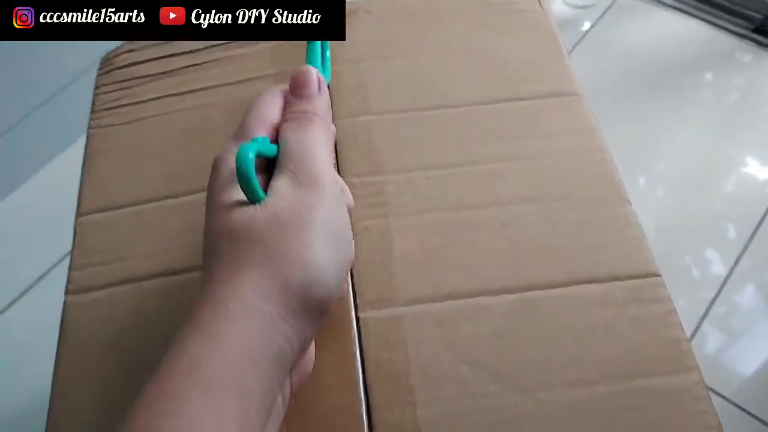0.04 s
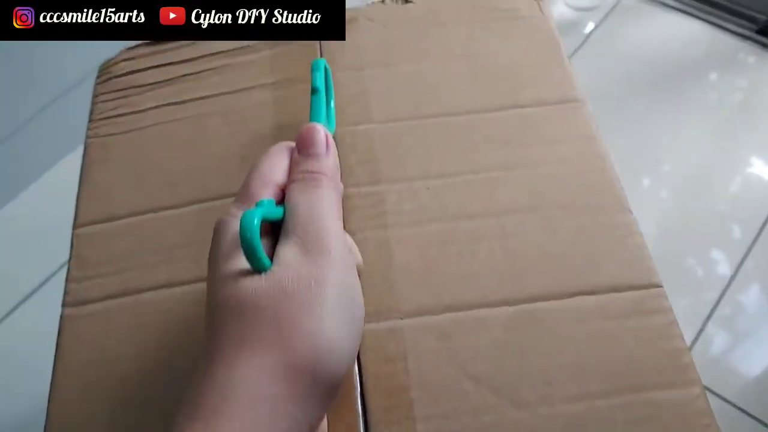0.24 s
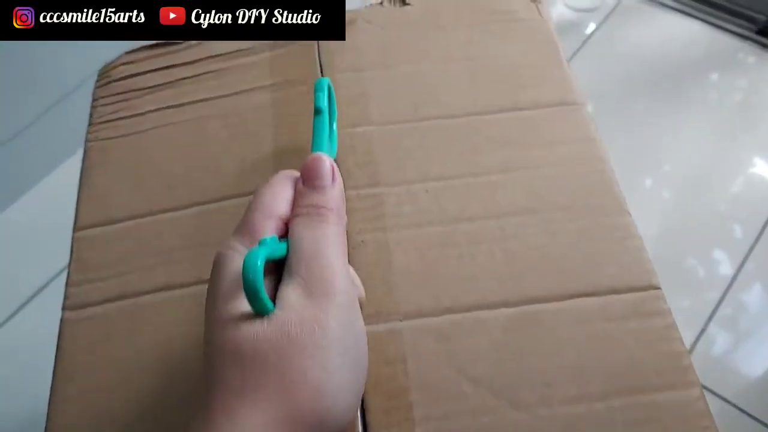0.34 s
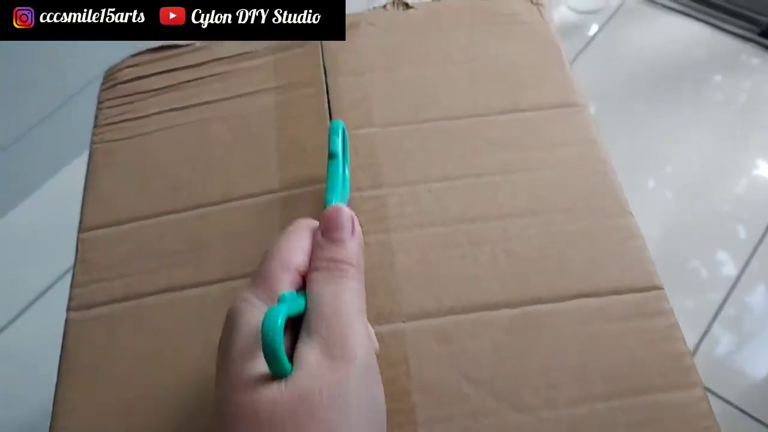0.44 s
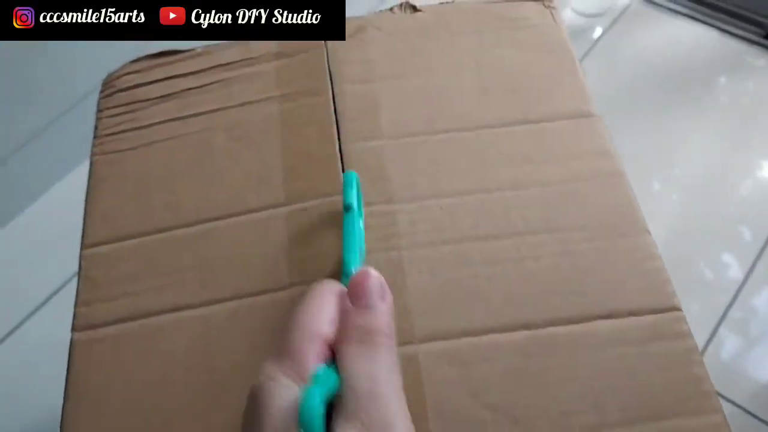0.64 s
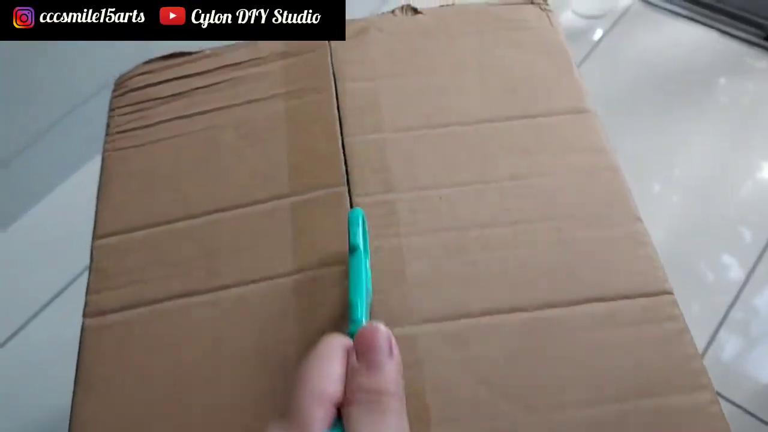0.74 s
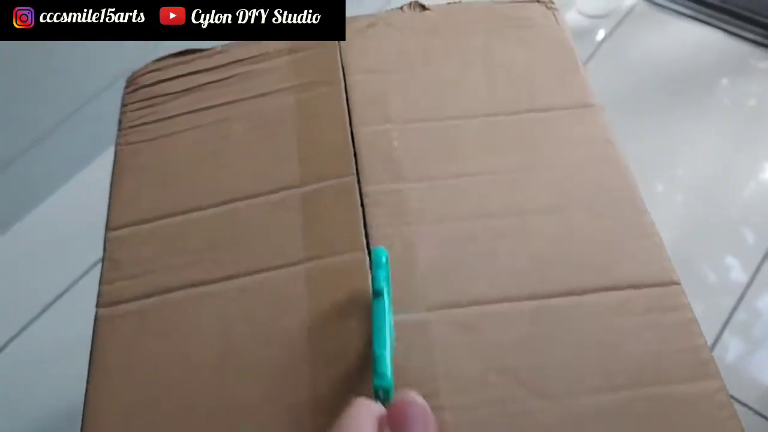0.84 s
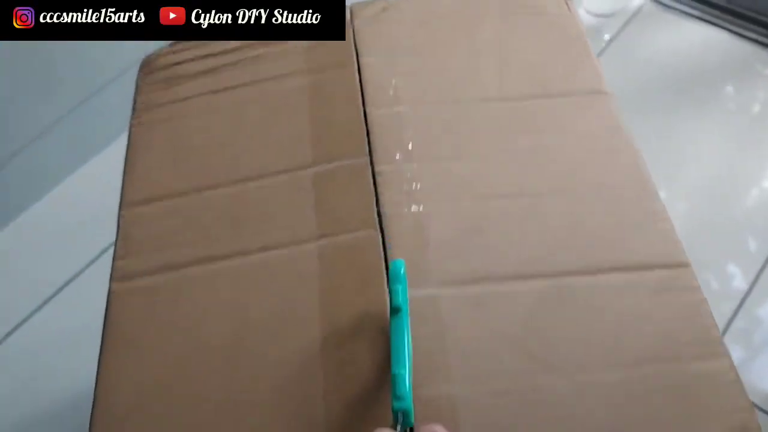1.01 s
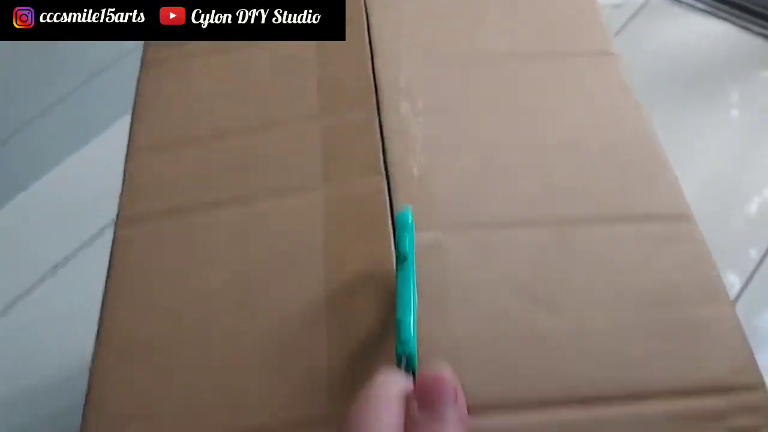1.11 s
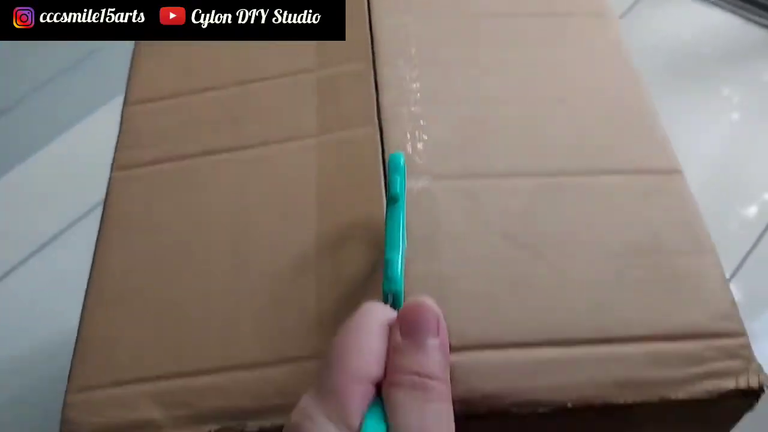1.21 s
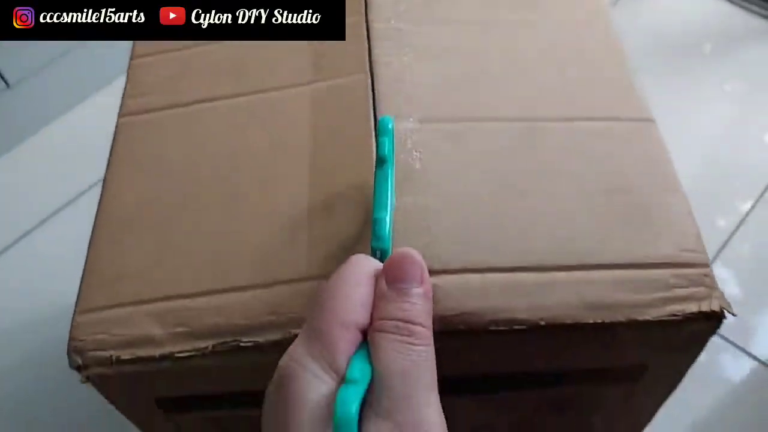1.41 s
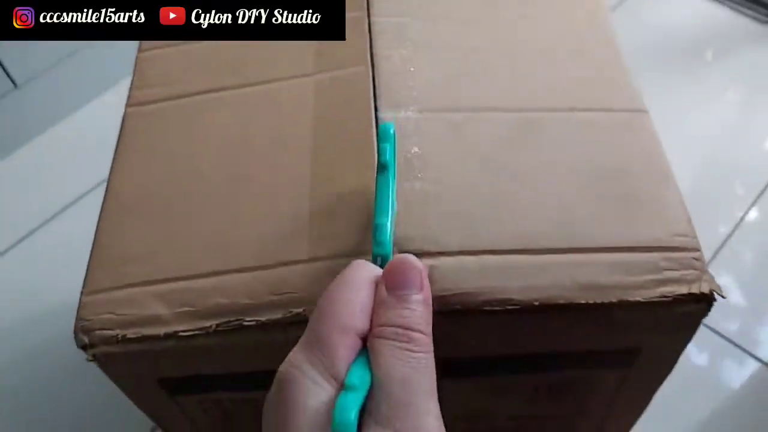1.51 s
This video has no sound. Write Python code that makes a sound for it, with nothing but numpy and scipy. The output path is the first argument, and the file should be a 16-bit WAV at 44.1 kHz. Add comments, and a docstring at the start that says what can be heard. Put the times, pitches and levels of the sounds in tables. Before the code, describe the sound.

Scissors scraping through packing tape on a cardboard box, snagging and snapping, then sliding on.

```python
"""A scissor blade is drawn along the taped seam of a cardboard box in a small hard-floored room.
First it snags and jerks free: each time the tape crackles, a flap thumps and the box rings.
After the loudest snap, at 0.72 s, it runs on in a steady rasp of breaking fibres; friction
keeps the box droning and the cut edge creaks. Near 1.2 s it rests, then goes on more lightly."""
import sys
import numpy as np
from scipy import signal
from scipy.fft import rfft, irfft
from scipy.io import wavfile
from scipy.ndimage import uniform_filter1d

SR = 44100
rng = np.random.default_rng(int(sys.argv[2]) if len(sys.argv) > 2 else 0)


def int16_out(signal):
    """Quantize to a 16-bit WAV file."""
    q = np.round(np.clip(np.atleast_2d(signal).T, -1, 1) * 32767)
    wavfile.write(sys.argv[1], SR, q.astype(np.int16))


N = 68355
T = np.arange(N) / SR

# modes of flaps and enclosed air: (frequency [Hz], thumped gain [dB], rubbed gain [dB], t60 [s])
BOX_MODES = [(121, -20, -14, 0.093), (162.8, -21.5, 2, 0.11), (184.2, -22.5, -4, 0.15),
             (306.7, -5.5, -7.5, 0.07), (373.4, -41, 0, 0.09), (474, -31, -20, 0.1),
             (617, -19, -13.5, 0.041), (738, -16.5, -19.5, 0.045)]


def from_db(db):
    """Decibels to gain."""
    return 10 ** (np.asarray(db) / 20)


def unit_rms(x):
    """Scale to rms 1."""
    return x / np.sqrt(np.mean(x ** 2) + 1e-20)


def at_hz(points, hz):
    """Interpolate a curve over log frequency."""
    points_hz, values = np.transpose(points)
    return np.interp(np.log(hz), np.log(points_hz), values)


def butter(x, hz, kind, order=2):
    """Butterworth filter."""
    return signal.sosfilt(signal.butter(order, hz, kind, fs=SR, output="sos"), x + 1e-18)


def band(x, hz, ratio):
    """Band-pass from hz / ratio to hz * ratio."""
    return butter(x, [hz / ratio, hz * ratio], "band")


def flutter(rate_hz, spread_db):
    """Randomly wandering gain."""
    drift = butter(rng.standard_normal(2 * N), rate_hz, "low")[N:]
    return from_db(spread_db * unit_rms(drift))


def noise(spectrum):
    """Partly coherent stereo noise of a given spectral shape; rms 1."""
    # (frequency [Hz], left-right coherence [1])
    coherence = [(100, .98), (400, 0.56), (800, 0.96), (1500, 0.53), (3000, 0), (6000, 0.042), (15000, 0.3)]
    # (frequency [Hz], left minus right [dB])
    balance = [(500, 3), (1200, 1.5), (2500, 1), (5000, -0.5), (9000, -7), (14000, -1.5)]
    hz = np.fft.rfftfreq(N, 1 / SR) + 1
    mid, side = rfft(rng.standard_normal((2, N)))
    alike, sign = at_hz(coherence, hz), np.array([[1], [-1]])
    stereo = np.sqrt(1 + alike) * mid + sign * np.sqrt(1 - alike) * side
    skirts = np.minimum(hz / spectrum[0][0], 1) ** 2 * np.minimum(spectrum[-1][0] / hz, 1) ** 2
    gain = skirts * from_db(at_hz(spectrum, hz) + sign * at_hz(balance, hz) / 2)
    return unit_rms(irfft(gain * stereo, N))


def ambience(level_db=-57):
    """Faint, steady rumble of the room."""
    # (frequency [Hz], relative density [dB])
    spectrum = [(25, -29), (45, -20), (70, 8), (110, 1), (180, 2), (260, -12), (370, 0.5), (480, -22),
                (1000, -20), (3000, -41), (15000, -40.5)]
    return from_db(level_db) * noise(spectrum)


def room(x, t60_s=0.26, build_s=0.0067):
    """Diffuse reflections thicken and die away, independently left and right."""
    envelope = from_db(-60 * T / t60_s) * (1 - np.exp(-(T / build_s) ** 2))
    tail = rng.standard_normal((2, N)) * envelope
    tail /= np.sqrt(np.sum(tail ** 2, axis=1, keepdims=True))
    return signal.fftconvolve(x, tail, axes=1)[:, :N]


def creaks(length_s=0.0057, width_hz=140):
    """The cut edge squeaks against the blade in short, narrow-band bursts."""
    # (time [s], frequency [Hz], level [dB])
    events = [(0.948, 1827, -38.5), (1.079, 689, -48), (1.103, 1450, -42.5), (1.111, 742, -39),
              (1.12, 1170, -46), (1.146, 1320, -48)]
    white, squeaks = rng.standard_normal(N), 0
    for time_s, hz, db in events:
        envelope = from_db(db) * np.exp(-((T - time_s) / length_s) ** 2)
        squeaks += envelope * unit_rms(band(white, hz, 1 + width_hz / hz / 2))
    return squeaks


def rubbed_mode(force, hz, t60_s, broadening=1.8, evenness=0.42):
    """Friction drives a box mode, widens it and partly evens out its swell; rms 1."""
    mode = band(force, hz, 1 + broadening * np.log(1000) / (2 * np.pi * t60_s * hz))
    power = np.abs(uniform_filter1d(mode ** 2, size=600))
    return unit_rms(mode / (power + 0.079 * power.mean()) ** (evenness / 2))


def struck_mode(kicks, hz, t60_s):
    """A unit kick sets a box mode ringing at amplitude 1."""
    r, w = from_db(-60 / (t60_s * SR)), 2 * np.pi * hz / SR
    return signal.lfilter([1, -r * np.cos(w)], [1, -2 * r * np.cos(w), r * r], kicks + 1e-18)


def fibres(breaks_per_s=2500, spread_db=1.5, smooth_share=0.44):
    """Grainy envelope of tiny breaks in tape and paper; rms 1."""
    breaks = rng.random(N) < breaks_per_s / SR
    strength = from_db(spread_db * np.minimum(rng.exponential(1, N), 5))
    power = uniform_filter1d((breaks * strength) ** 2, size=12)
    return np.sqrt(smooth_share + (1 - smooth_share) * np.abs(power) / power.mean())


def slicing(bite_s=0.725, bite_fade_s=0.16, bite_db=-32.5):
    """The sliding blade breaks fibres in an uneven stream that drives the box; returns tape, box."""
    # friction levels before trim: (time [s], hiss [dB], rasp [dB], box drone [dB])
    jerky = [(0, -59.5, -58, -46.5), (.06, -82, -76, -52), (.09, -64.5, -68, -55), (.115, -49, -41.5, -48),
             (.17, -68, -63, -50), (.225, -52, -50, -33.5), (.26, -45.5, -41.5, -23.5),
             (.32, -53.5, -45.5, -38.5), (.375, -53, -50.5, -44.5), (.415, -44.5, -44, -31),
             (.45, -54, -57, -59), (.465, -47, -42.5, -33), (.515, -42.5, -38.5, -23),
             (.565, -76, -78, -53), (.61, -50, -55, -33), (.65, -77, -67.5, -51), (.705, -61, -61, -48)]
    steady = [(.735, -44.5, -47.5, -34.5), (.85, -43, -44, -31), (.9, -54, -50, -34),
              (.922, -40.5, -35, -27.5), (.955, -43.5, -40.5, -32.5), (.99, -56, -63, -32),
              (1.012, -52, -49, -60), (1.04, -51.5, -45.5, -32), (1.098, -47.5, -39.5, -35.5),
              (1.16, -59, -63, -39.5), (1.205, -86, -89, -58), (1.29, -74.5, -75, -66),
              (1.35, -56, -53, -44), (1.4, -54, -49, -38), (1.55, -49.5, -46.5, -41.5)]
    # friction noise: (frequency [Hz], relative density [dB])
    hiss_spectrum = [(2000, -24), (3500, 3), (5000, 0), (6000, -1), (7500, 2.5), (9000, -4.5), (10500, 0),
                     (12000, -6.5), (15000, 2)]
    rasp_spectrum = [(400, -7.5), (720, 11), (930, -11), (1100, 5), (1450, 3.5), (1900, -4), (2450, -2),
                     (2900, -4), (3500, -5), (4500, -21.5), (8000, -41)]
    bite_spectrum = [(60, -17), (130, 10), (260, 9.5), (400, 7), (520, 13), (660, 7.5), (900, 1),
                     (2000, -43)]
    times_s, *levels_db = np.transpose(list(jerky) + list(steady))
    trims_db = (-1.5, -2, -1)
    hiss, rasp, drone = [from_db(np.interp(T, times_s, db) + trim_db)
                         for db, trim_db in zip(levels_db, trims_db)]
    grain = fibres() * flutter(rate_hz=36.6, spread_db=2)  # blade judder
    grit = unit_rms(flutter(rate_hz=103, spread_db=2))  # paper under the tape gives in uneven runs
    tape = grain * (hiss * noise(hiss_spectrum) + rasp * grit * noise(rasp_spectrum))
    force = grain * rng.standard_normal(N)
    body = unit_rms(sum(from_db(db) * rubbed_mode(force, hz, t60_s) for hz, _, db, t60_s in BOX_MODES))
    # after the big snap the blade sits deep and shakes the flaps
    bite = from_db(bite_db) * (T > bite_s) * np.exp(-((T - bite_s) / bite_fade_s) ** 2)
    return tape, drone * body + bite * grain * noise(bite_spectrum)


def snags(knock_trim_db=-1, release_hz=740):
    """Each snag tears in a burst, lets a flap spring back and rings the box; returns tape, box."""
    # tape gives way: (time [s], crackle [dB], burst decay [s], paper crack [dB], crack centre [Hz],
    # flap knock before trim [dB], knock pitch [Hz], kick to the box [dB])
    events = [(0.1129, -41.5, 0.0025, -41.5, 2300, -28, 470, -16),
              (0.1236, -45.5, 0.0038, -41, 2370, -30, 464, -25),
              (0.193, -46, 0.0061, -48, 2000, -36.5, 374, -29),
              (.2082, -29.5, .0012, -31, 2420, -13, 324, -14),
              (0.242, -34, 0.0016, -25.5, 1740, -16, 470, -24),
              (0.2451, -30.5, .001, -33.5, 2190, -44, 484, -24),
              (0.2519, -38, 0.0033, -37, 1590, -15.5, 377, -21),
              (.2660, -34, 0.0016, -31, 1430, -27, 400, -28),
              (0.2812, -28.5, .0014, -31.5, 1580, -16, 440, -15),
              (0.301, -53, 0.00057, -44, 1300, -34, 433, -28),
              (0.3441, -40, 0.0053, -43, 1490, -25, 378, -16.5),
              (0.3939, -27.5, 0.0022, -31, 800, -9, 400, -12.5),
              (0.4685, -29, 0.0012, -50, 1530, -22, 517, -31),
              (.4927, -32.5, 0.0046, -37.5, 3200, -20, 510, -38),
              (0.496, -40, 0.0028, -32, 1210, -13.5, 412, -10.5),
              (0.515, -40.5, 0.0056, -37.5, 1180, -15, 367, -17),
              (0.5882, -38.5, 0.0014, -46, 1520, -28.5, 356, -31),
              (0.596, -32.5, 0.0027, -32, 1700, -25.5, 333, -12.5),
              (0.7137, -36.5, 0.0011, -23.5, 830, -14.5, 420, -36),
              (.718, -24.5, 0.0019, -19, 2500, -1, 407, -6.5),
              (0.817, -39, 0.0045, -39, 2510, -42, 450, -27), (0.8387, -41, .002, -40, 1510, -18, 415, -29),
              (0.856, -40.5, 0.0031, -38.5, 2460, -48, 444, -26.5),
              (0.9636, -47, 0.00056, -41, 2400, -45, 600, -29.5),
              (0.9785, -33.5, 0.0023, -30, 2190, -34, 660, -29.5),
              (1.027, -40, 0.0023, -37.5, 2530, -38, 655, -29.5),
              (1.0897, -43, .002, -43, 1740, -49, 656, -30.5),
              (1.4476, -34.5, 0.00043, -52, 3000, -42, 607, -30)]
    # tape crackle and paper crack: (frequency [Hz], relative density [dB])
    crackle_spectrum = [(1500, 10), (2500, -0.5), (3500, 2), (5000, 0.5), (7500, 3), (10500, 2.5),
                        (15000, 2)]
    crack_spectrum = [(400, 1), (1300, 13), (1850, -4), (2250, 8), (2700, -1.5), (3400, 4), (4500, -24.5),
                      (8000, -25)]
    paper = noise(crack_spectrum)
    crackle = cracks = knocks = kicks = 0
    for time_s, crackle_db, decay_s, crack_db, crack_hz, knock_db, knock_hz, kick_db in events:
        burst = np.exp(-np.abs(T - time_s) / decay_s)
        crackle += from_db(crackle_db) * burst
        cracks += from_db(crack_db) * burst * unit_rms(band(paper, crack_hz, ratio=1.57))
        click = np.maximum(1 - np.abs(T - time_s) * SR, 0)
        knock = band(click, knock_hz, ratio=1.337)
        knocks += from_db(knock_db + knock_trim_db) * knock / np.abs(knock).max()
        kicks += from_db(kick_db) * click
    ringing = sum(from_db(db) * struck_mode(kicks, hz, t60_s) for hz, db, _, t60_s in BOX_MODES)
    thumps = butter(knocks + ringing, release_hz, "low", order=3)  # soft release
    tape = fibres() * (crackle * noise(crackle_spectrum) + cracks)
    return tape, butter(thumps, 63, "high", order=3)


def scene(right_lag_s=5e-5, dry_below_hz=440):
    """Tape and box close by, the room behind them."""
    snaps, thumps = snags()
    rasp, drone = slicing()
    tape = snaps + rasp + creaks()
    left, right = thumps + drone
    box = np.array([left, np.interp(T - right_lag_s, T, right)])
    room_send = from_db(-5.5) * tape + from_db(-9) * butter(box, dry_below_hz, "high")
    return tape + box + room(room_send) + ambience()


def record(dry):
    """Steep low-pass on the top treble."""
    cutoff_hz = 15500
    return signal.sosfilt(signal.ellip(10, 0.2, 80, cutoff_hz, fs=SR, output="sos"), dry)


dry = scene()
out = record(dry)
int16_out(out)
```